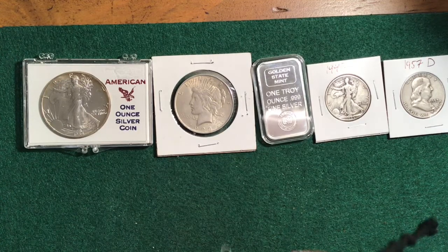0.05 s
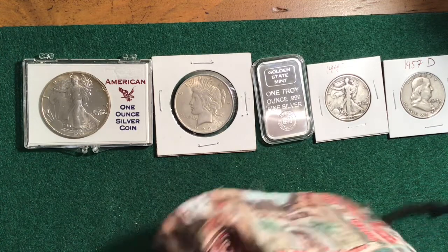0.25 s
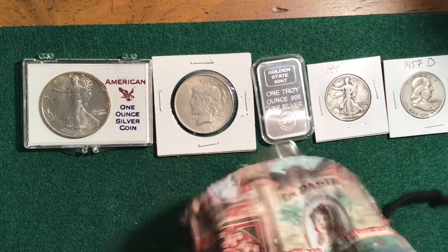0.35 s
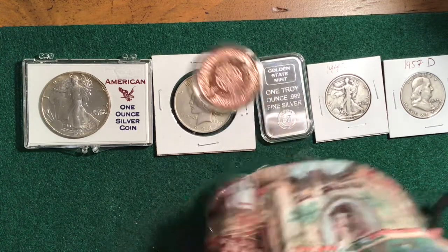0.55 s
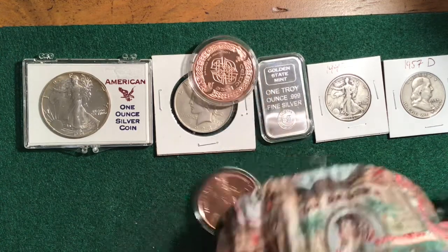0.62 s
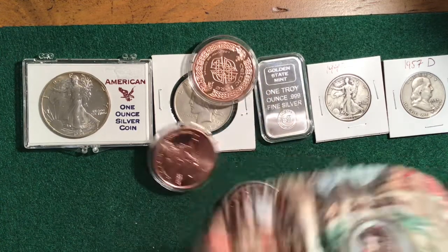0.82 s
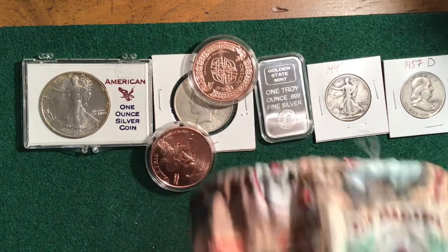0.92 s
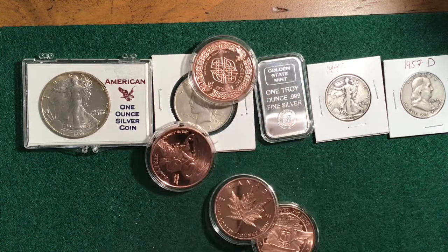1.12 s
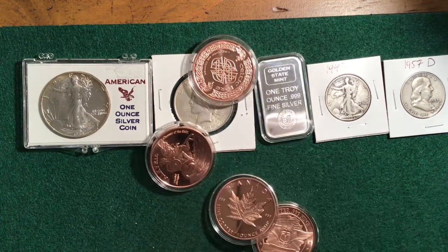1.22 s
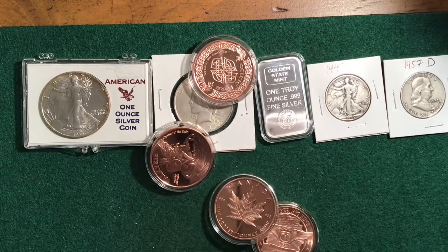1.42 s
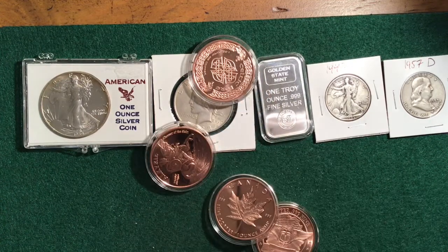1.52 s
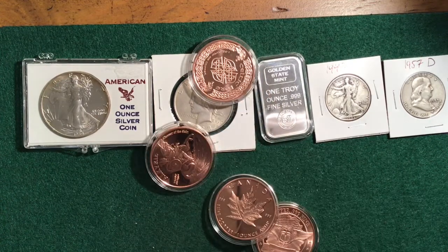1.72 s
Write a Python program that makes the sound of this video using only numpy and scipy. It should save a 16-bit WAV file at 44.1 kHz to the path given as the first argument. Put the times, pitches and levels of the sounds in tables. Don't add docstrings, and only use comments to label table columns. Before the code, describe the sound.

Coins in hard plastic capsules spill from a cloth bag and clatter onto a felt-covered table

```python
import sys
import numpy as np
from scipy import signal
from scipy.io import wavfile

SR = 44100
rng = np.random.default_rng(int(sys.argv[2]) if len(sys.argv) > 2 else 0)


def rack_gain(trim_db):
    fader = np.asarray(trim_db, float)
    return 10 ** (fader / 20)


def store_wav(level_fs):
    pcm = np.round(np.clip(np.atleast_2d(level_fs), -1, 1) * 32767)
    wavfile.write(sys.argv[1], SR, pcm.T.astype(np.int16))


N = 77175
MODE_SPREAD_DB = 2.5


def ring(clicks, hz, t60):
    radius = rack_gain(-60 / (t60 * SR))
    angle = 2 * np.pi * hz / SR
    feedback = [1, -2 * radius * np.cos(angle), radius * radius]
    return signal.lfilter([0, np.sin(angle)], feedback, clicks + 1e-18)


def add(out, start, dry, space, wet_db):
    both = rack_gain(wet_db) * signal.fftconvolve(dry, space)
    both[:len(dry)] += dry
    i = int(start * SR)
    out[i:i + len(both)] += both[:N - i]


def capsules(spaces, count=5):
    # (time [s], face pitch [Hz], face level [dB], rim level [dB], coin level [dB])
    clacks = [(.0052, 2140, -43, -39, -43.5), (.1075, 2830, -50.5, -58, -72), (.2318, 1870, -44, -43, -48),
              (.243, 1890, -36, -39.5, -47), (.250, 3300, -37.5, -55, -64), (0.263, 2640, -42, -36.5, -44),
              (.3086, 2220, -23.5, -21.5, -26.5), (.3312, 2300, -28, -21.5, -24),
              (.3535, 2110, -27.5, -23.5, -26), (.4021, 2400, -38, -29, -31),
              (.4113, 2400, -24.5, -25, -22.5), (.5705, 2530, -40.5, -40.5, -46.5),
              (.5945, 3130, -39, -44.5, -53), (.612, 3300, -51, -82, -66), (.6354, 2480, -20, -16.5, -17.5),
              (.6445, 2920, -15.5, -19, -25), (0.682, 2650, -23.5, -23.5, -12),
              (.687, 2800, -22.5, -20.5, -30), (.693, 2700, -27.5, -22, -35),
              (.7575, 3090, -23, -27, -23.5), (0.769, 2700, -28.5, -25, -26),
              (.8257, 2840, -21.5, -33.5, -29.5), (.8345, 2920, -31, -31, -37),
              (1.342, 2600, -60, -57, -65)]
    # (ratio to face pitch [1], level [dB], t60 [s])
    face_modes = [(.55, -19.5, 0.0029), (.7, -8.5, 0.0041), (0.821, -6.5, 0.0082), (0.922, -2, 0.0084),
                  (1.001, -4, 0.012), (1.068, 0.5, 0.0081), (1.25, -3.5, 0.0019)]
    # (frequency [Hz], level [dB], t60 [s])
    rim_modes = [(4100, 6.5, 0.0017), (4350, -1.5, 0.0014), (5044, -4, 0.0073), (5790, 0.5, 0.0025),
                 (6700, -2.5, 0.0026)]
    # (frequency [Hz], level [dB], t60 [s])
    coin_modes = [(8300, -3, 0.0022), (8510, 3, 0.002), (9170, 2.5, 0.0032), (11200, -3.5, 0.0013),
                  (11730, -4.5, 0.00088), (14200, -12, 0.0017)]
    # (frequency [Hz], level [dB], t60 [s])
    holder_modes = [(2400, -24, 0.16), (2593, -27, 0.22), (2700, -25, 0.17), (2790, -24, 0.25),
                    (2880, -20, 0.2), (3100, -26.5, 0.24), (3040, -23.5, 0.25), (3300, -14, 0.16)]
    rattle_s, rattle_loss_db, spread_s = 0.0074, 9.5, 0.001
    touch_spread_db, first_touch_db = 2.5, 5
    detune = 0.032
    holder_db_per_octave = 15

    out = np.zeros(N)
    for k, (start, pitch, face_db, rim_db, coin_db) in enumerate(clacks):
        share = np.sort(rng.random(count)) * (np.arange(count) > 0)
        touch_db = -rattle_loss_db * share
        touch_db += touch_spread_db * rng.standard_normal(count) * (share > 0)
        touch_db += first_touch_db * (share == 0)

        modes = [(ratio * pitch, face_db + db, t60) for ratio, db, t60 in face_modes]
        modes += [(hz, rim_db + db, t60) for hz, db, t60 in rim_modes]
        modes += [(hz, coin_db + db, t60) for hz, db, t60 in coin_modes]
        modes += [(hz, face_db + db - holder_db_per_octave * abs(np.log2(hz / pitch)), t60)
                  for hz, db, t60 in holder_modes]

        dry = np.zeros(SR // 4)
        luck = rng.standard_normal((len(modes), 3, count))
        for (hz, db, t60), (level_luck, sign_luck, mode_luck) in zip(modes, luck):
            times = share * rattle_s + spread_s * abs(mode_luck[1])
            heights = rack_gain(db - 6.5 + touch_db + MODE_SPREAD_DB * level_luck) * np.sign(sign_luck)
            clicks = np.zeros(SR // 4)
            np.add.at(clicks, (times * SR).astype(int), heights)
            dry += ring(clicks, hz * (1 + detune * mode_luck[0]), t60)
        add(out, start, dry, spaces[k % len(spaces)], wet_db=1.5)
    return out


def table_top(spaces):
    # (time [s], level [dB], favoured pitch [Hz], contact time [s])
    thuds = [(.2225, -20, 197, 0.0039), (.257, -33.5, 350, 0.0016), (.3035, -20.5, 230, 0.001),
             (0.319, -19.5, 220, 0.0011), (.333, -21.5, 330, 0.00078), (.342, -57, 230, 0.0026),
             (0.355, -28, 330, 0.0006), (.411, -28.5, 330, 0.00089), (.561, -33, 195, 0.003),
             (.636, -22, 215, 0.00038), (.640, -34.5, 690, 0.00048), (.681, -23.5, 240, 0.00033),
             (.686, -28, 590, 0.00029), (.702, -27, 327, 0.0013), (.7305, -23.5, 235, 0.0009),
             (0.778, -27.5, 600, 0.0012), (.827, -35, 280, 0.0011), (1.731, -58, 215, 0.0033),
             (1.7425, -55.5, 250, 0.003)]
    # (frequency [Hz], level [dB], t60 [s])
    plate_modes = [(129.6, -6, 0.055), (188.4, -2.5, 0.1), (210.8, 1, 0.063), (256, -0.5, 0.063),
                   (281, -3.5, 0.03), (318.2, -0.5, .08), (409, -5, 0.061), (499, -0.5, 0.047),
                   (590, -1, 0.06), (700, -1.5, 0.07), (824, -0.5, 0.043), (1009, 1, 0.048),
                   (1353, -5.5, .03)]
    favour_db_per_octave = 7.5

    out = np.zeros(N)
    luck = rng.standard_normal((len(thuds), len(plate_modes)))
    for k, (start, level_db, favoured, contact) in enumerate(thuds):
        shape = np.hanning(int(contact * SR) + 3)
        push = np.zeros(SR // 4)
        push[:len(shape)] = shape / shape.sum()
        dry = np.zeros(SR // 4)
        for j, (hz, mode_db, t60) in enumerate(plate_modes):
            db = level_db - 1.5 + mode_db + MODE_SPREAD_DB * luck[k, j]
            db -= favour_db_per_octave * abs(np.log2(hz / favoured))
            dry += (-1) ** j * rack_gain(db) * ring(push, hz, t60)
        add(out, start, dry, spaces[k % len(spaces)], wet_db=-0.5)
    return signal.sosfilt(signal.butter(4, 125, "high", fs=SR, output="sos"), out)


def table_legs():
    # (time [s], level [dB], t60 [s])
    sways = [
        (0.252, -30.5, 0.18),
        (.30, -43, 1),
        (0.662, -27, 0.17),
        (.85, -45.5, .6),
    ]
    out = np.zeros(N)
    for start, db, t60 in sways:
        t = np.maximum(np.arange(N) / SR - start, 0)
        rise = 1 - np.exp(-t / 0.01)
        out += rack_gain(db - 60 * t / t60) * rise * np.sin(2 * np.pi * 60.8 * t)
    return out


def bag_taps():
    # (time [s], level [dB], pitch [Hz], t60 [s])
    tap_events = [
        (.005, -54.5, 560, 0.034),
        (1.232, -53, 720, 0.0099),
        (1.381, -50, 990, 0.007),
        (1.392, -55.5, 700, .012),
    ]
    out = np.zeros(N)
    for start, db, hz, t60 in tap_events:
        click = np.zeros(N)
        click[int(start * SR)] = rack_gain(db)
        for ratio in (0.7, 1.0, 1.45):
            out += ring(click, hz * ratio, t60)
    return out


def at_hz(points, hz):
    table_hz, values = np.transpose(points)
    return np.interp(np.log(hz), np.log(table_hz), values)


def band_pass(x, order, edges):
    return signal.sosfilt(signal.butter(order, edges, "band", fs=SR, output="sos"), x)


def bands(size):
    edges = 100 * 2 ** np.arange(0, 7.7, 0.5)
    white = rng.standard_normal((2, size))
    return [(np.sqrt(low * high), band_pass(white[k % 2], 2, [low, high]))
            for k, (low, high) in enumerate(zip(edges, edges[1:]))]


def rooms(count):
    # (frequency [Hz], t60 [s])
    room_t60 = [(200, 0.43), (800, 0.3), (1900, 0.35), (2700, 0.31), (4000, 0.38), (7000, 0.29),
                (12000, 0.23)]
    build_s, early_db, early_s = 0.0011, 6, 0.0083
    t = np.arange(SR // 2) / SR
    noise = bands(3 * SR)
    out = np.zeros((count, len(t)))
    for k, i in enumerate(rng.integers(SR // 4, 2 * SR, count)):
        for hz, band in noise:
            out[k] += band[i:i + len(t)] * rack_gain(-60 * t / at_hz(room_t60, hz))
    out *= 1 - np.exp(-t / build_s)
    out *= 1 + rack_gain(early_db) * np.exp(-t / early_s)
    return out / np.sqrt(np.sum(out ** 2, axis=1, keepdims=True))


def rms_one(x):
    return x / np.sqrt(np.mean(x ** 2) + 1e-20)


def in_time(rows):
    return np.interp(np.arange(N) / SR, *np.transpose(rows))


def low_noise(low_hz, high_hz):
    return rms_one(band_pass(rng.standard_normal(N + SR), 2, [low_hz, high_hz])[SR:])


def background():
    # (frequency [Hz], density [dB per Hz])
    hiss_spectrum = [(59, -42), (100, -12.5), (156, -3), (277, -4.5), (295, -12), (583, -14), (1250, -18.5),
                     (9020, -25), (16000, -47)]
    # (time [s], level [dB])
    hiss_swell = [(0, -4.5), (.2, -5.5), (1.0, -4.5), (1.4, -3.5), (1.65, -5.5), (1.75, -3.5)]
    # (time [s], level [dB])
    rumble_level = [(0.0, -62), (0.76, -56.5), (0.788, -48.5), (0.994, -56), (1.388, -57.5), (1.52, -45),
                    (1.568, -51), (1.676, -44), (1.75, -48)]
    hiss = rms_one(sum(band * rack_gain(at_hz(hiss_spectrum, hz)) for hz, band in bands(N)))
    rumble = low_noise(8, 27.9)
    hum = low_noise(48.4, 92)
    return hiss * rack_gain(-56 + in_time(hiss_swell)) + rumble * rack_gain(in_time(rumble_level)) + hum * rack_gain(-63.5)


def scene():
    spaces = rooms(count=8)
    contacts = capsules(spaces) + table_top(spaces) + table_legs() + bag_taps()
    return (contacts + background())[None]


def top_cut(x):
    return signal.sosfilt(signal.butter(12, 16670, fs=SR, output="sos"), x)


def record(dry):
    low_pass = signal.ellip(8, 0.3, 37, 15750, fs=SR, output="sos")
    mix = signal.sosfilt(low_pass, dry)
    return top_cut(mix)


dry = scene()
out = record(dry)
store_wav(out)
```